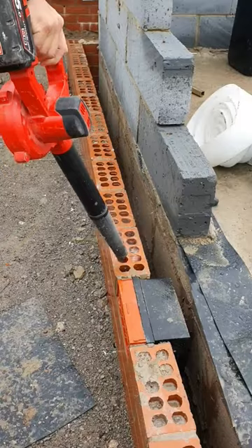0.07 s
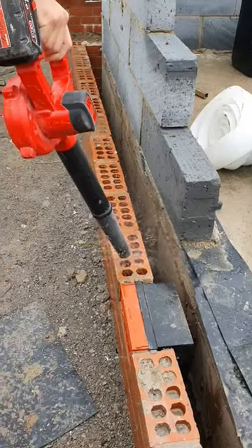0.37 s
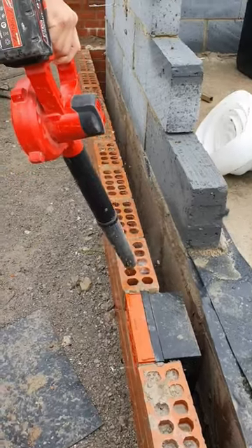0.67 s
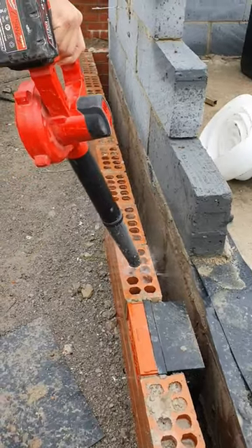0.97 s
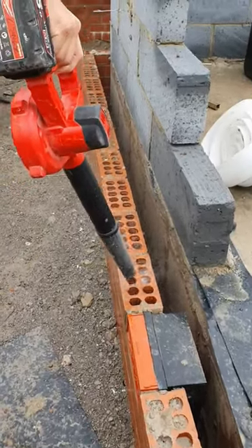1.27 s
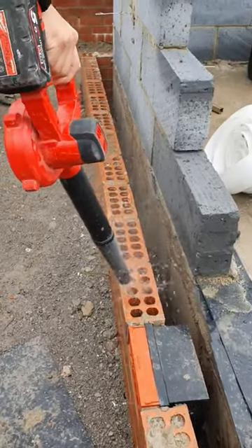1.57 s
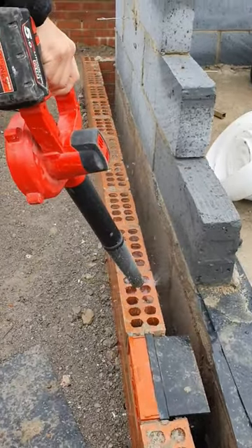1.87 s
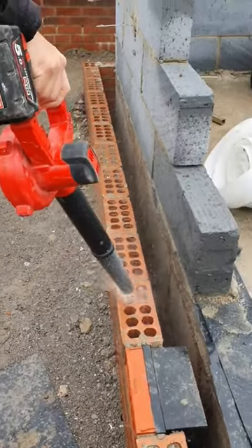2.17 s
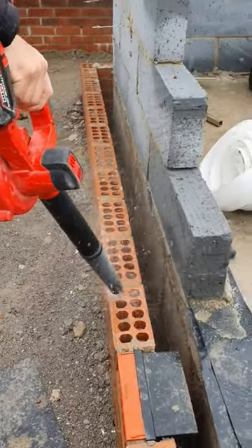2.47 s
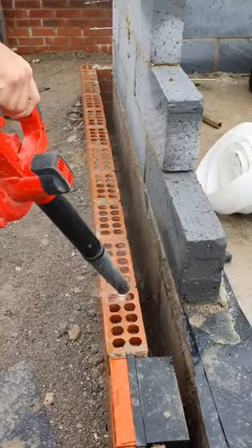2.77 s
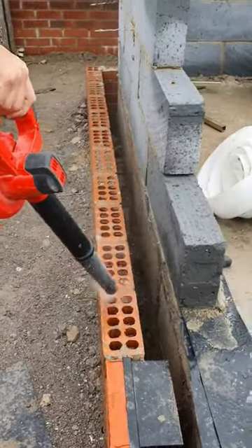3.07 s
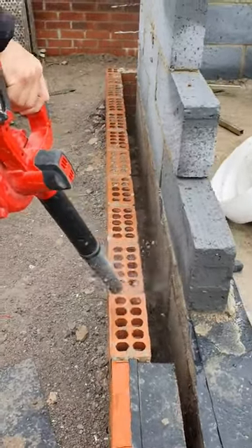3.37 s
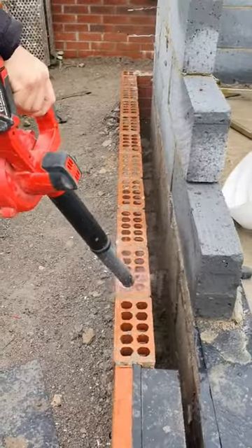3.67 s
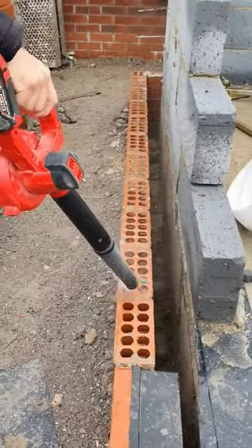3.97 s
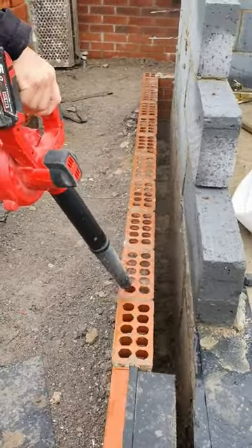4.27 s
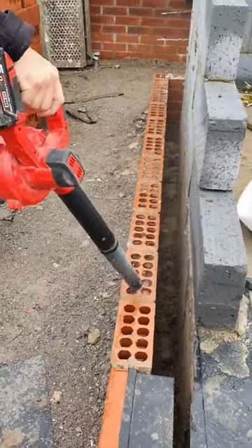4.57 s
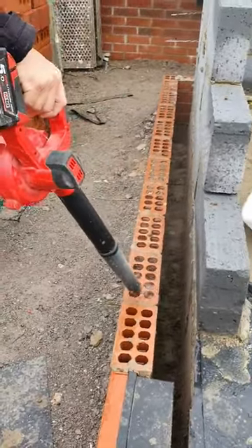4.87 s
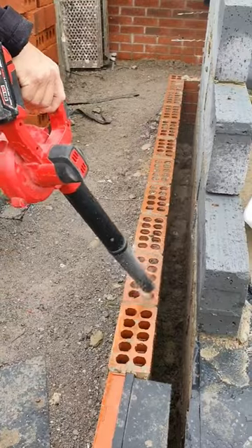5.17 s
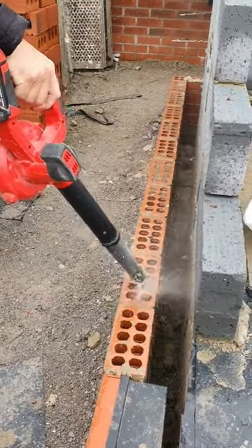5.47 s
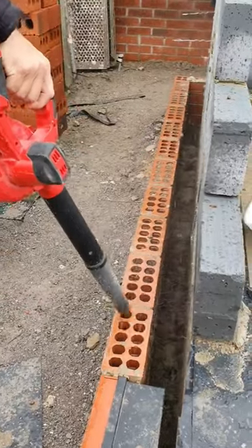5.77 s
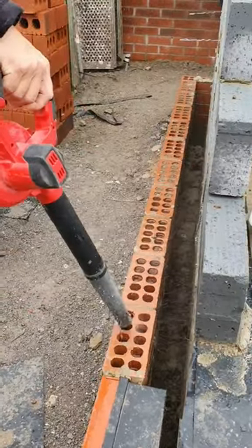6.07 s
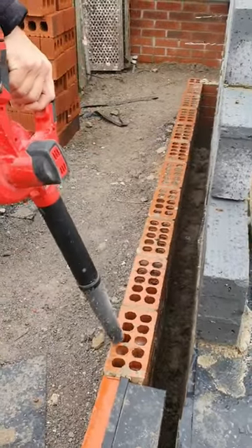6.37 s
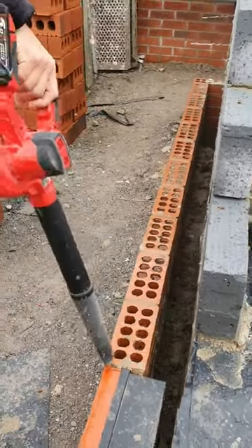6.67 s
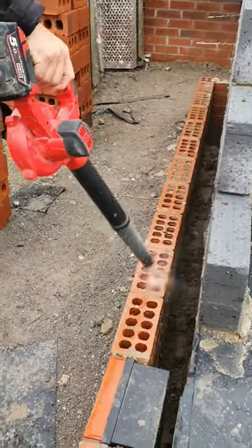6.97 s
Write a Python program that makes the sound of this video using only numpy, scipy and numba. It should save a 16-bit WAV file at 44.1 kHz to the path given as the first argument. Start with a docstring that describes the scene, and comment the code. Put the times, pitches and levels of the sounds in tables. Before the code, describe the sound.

On a building site, an arm's length from the microphone, a handheld blower clears water from holes in bricks. The fan's high whine and the rushing air never stop, while hollow howls and brief gliding whistles come and go over a spitting hiss. Low splutters of water come near the start and again after about five seconds. A far engine rumbles underneath, swelling slightly towards the end.

```python
"""On a building site, an arm's length away, a cordless blower at full speed clears water from the holes
of a brick course. Its impeller whines over the rush of air in the tube. The jet makes the holes howl and
whistle, rasps and sings on the brick edges, and throws up spitting spray and a few slugs of water.
An engine drones somewhere else on the site."""
import sys
import numpy as np
from scipy import signal
from scipy.fft import rfft, irfft
from scipy.io import wavfile
from scipy.ndimage import map_coordinates
from numba import njit

SR = 44100
rng = np.random.default_rng(int(sys.argv[2]) if len(sys.argv) > 2 else 0)


def log_audio(samples):
    """Write samples as a 16-bit WAV file to the path given in sys.argv[1]."""
    # one column per channel
    frames = np.atleast_2d(samples).T
    # limit to full scale, then quantise
    limited = np.clip(frames, -1, 1)
    pcm = np.round(limited * 32767).astype(np.int16)
    wavfile.write(sys.argv[1], SR, pcm)


N = 317961
TIME = np.arange(N) / SR
FREQ = np.maximum(np.fft.rfftfreq(N, 1 / SR), 1)


# Motor speed, sagging with battery and load. Each row: time in seconds, blade-pass pitch in Hz.
BLADE_PITCH = [(.13, 2955), (.9, 2959), (2.0, 2952), (3.0, 2953), (3.7, 2950), (4.9, 2947), (5.45, 2943),
               (6.0, 2951), (6.6, 2952), (7.0, 2946)]
# The whine at the two microphone ports. Each row: time in seconds, left level in dB, right level in dB.
WHINE_LEVELS = [(.16, -37, -40), (.5, -34.5, -33), (.84, -40, -34.5), (1.0, -37, -30.5), (1.6, -41, -25.5),
                (2.0, -28, -26), (2.1, -36, -30), (2.24, -33, -25), (2.46, -27.5, -25.5), (2.96, -36, -42),
                (3.2, -30, -25.5), (3.28, -31, -33), (3.34, -39, -39), (3.58, -27, -27.5),
                (3.78, -33.5, -35), (3.92, -34, -26), (4.08, -36, -46), (4.28, -34, -29), (4.6, -41, -29),
                (4.94, -49, -27), (5.06, -49, -30), (5.13, -33, -31), (5.22, -45, -30.5),
                (5.48, -32, -25.5), (5.76, -34, -24.5), (5.86, -29, -22.5), (5.96, -34, -34),
                (6.2, -32, -26), (6.32, -34, -32), (6.6, -33, -35), (6.72, -47, -36), (6.92, -42, -29.5),
                (7.0, -41, -23.5), (7.08, -44, -27.5), (7.18, -52, -41)]
# Grit on the whine. Each row: time in seconds, phase shake in radians.
WHINE_GRIT = [(1.0, 0.24), (2.2, 0.52), (3.9, 0.48), (4.2, .75), (4.8, 0.62), (5.2, 0.24), (5.9, 0.26)]
# Motor hum as the housing turns. Each row: time in seconds, shaft tone in dB, its octave in dB.
SHAFT_HUM = [(.13, -41, -40.5), (1.5, -41.5, -43.5), (3.2, -43.5, -40.5), (4.8, -43, -40.5),
             (6.0, -45, -41.5), (7.2, -52, -39)]

def impeller(blades=9, flutter_db=2.0, sway_db=1.3, wander_rad=.72, hum_sway_db=1.0):
    """The blades whine, the shaft hums; reflections shift the whine at each port as the tool moves."""
    blade_hz, = curves(BLADE_PITCH)
    shaft_db, octave_db = curves(SHAFT_HUM)
    shake_rad, = curves(WHINE_GRIT)
    shaft_phase = 2 * np.pi * np.cumsum(blade_hz / blades) / SR
    blade_phase = blades * shaft_phase + shake_rad * walk(60)  # uneven inflow roughens the tone
    flutter = flutter_db * walk(34)
    whine = []
    for port_db in curves(WHINE_LEVELS):
        gain = undb(port_db + flutter + sway_db * walk(15))
        whine.append(gain * np.sin(blade_phase + wander_rad * walk(7)))
    hum = undb(shaft_db) * np.sin(shaft_phase) + undb(octave_db) * np.sin(2 * shaft_phase)
    hum *= undb(hum_sway_db * walk(.99))
    return np.sqrt(2) * (np.array(whine) + hum)


# The howl between holes. Each row: time in seconds, centre in Hz, relative level in dB.
COURSE_HOWL = [(.14, 1720, -20.5), (.55, 1530, -23.5), (1.1, 1630, -21.5), (1.22, 1550, -30.5),
               (1.4, 1660, -25.5), (2.15, 1470, -25.5), (2.45, 1380, -27.5), (3.25, 1500, -25),
               (3.8, 1270, -29.5), (4.92, 1380, -28), (5.6, 1340, -26), (6.2, 1430, -21),
               (6.55, 1580, -21.5), (6.77, 1730, -28), (6.95, 1512, -20), (7.2, 1245, -33)]
# The jet crosses a hole. Each row: start and end in seconds, start and end pitch in Hz,
# relative howl level in dB, relative whistle level in dB.
HOLE_CROSSINGS = [(.133, .265, 1806, 1760, -29, -31), (0.149, .25, 1680, 1600, -28, -33),
                  (.268, 0.363, 1850, 1790, -24.5, -23), (0.338, 0.432, 1694, 1600, -23, -26),
                  (.44, 0.59, 880, 847, -27.5, -33), (0.487, 0.59, 1600, 1620, -24, -21.5),
                  (0.576, 0.694, 1720, 1640, -21.5, -33), (0.686, 0.825, 1632, 1660, -20, -22.5),
                  (0.702, 0.801, 2180, 1950, -34, -17.5), (0.808, 0.882, 1720, 1700, -20, -23),
                  (.83, .94, 858, 888, -31, -26), (.885, 0.943, 1800, 1760, -21, -17),
                  (.9, 1.004, 1520, 1543, -22.5, -17.5), (0.96, 1.061, 1640, 1620, -26.5, -29),
                  (1.246, 1.344, 1510, 1580, -22.5, -32), (1.345, 1.463, 1557, 1440, -24, -21),
                  (1.415, 1.49, 1930, 1915, -34, -23), (1.578, 1.715, 1450, 1410, -36, -27),
                  (1.78, 1.892, 1480, 1420, -29, -22), (1.76, 1.96, 1910, 1910, -40, -25.5),
                  (1.905, 2.016, 1500, 1402, -33, -23), (2.017, 2.102, 1936, 1930, -34, -22),
                  (2.101, 2.157, 1397, 1350, -35, -17), (2.185, 2.317, 1544, 1484, -23, -21),
                  (2.32, 2.479, 1357, 1397, -35, -27), (2.614, 2.745, 1410, 1300, -27, -19.5),
                  (2.553, 2.862, 1890, 1880, -40, -29), (2.784, 2.9, 1220, 1290, -47, -37),
                  (2.95, 3.043, 1476, 1530, -22, -31), (2.93, 3.1, 1840, 1900, -39, -34),
                  (3.05, 3.124, 1480, 1580, -27, -18.5), (3.17, 3.254, 1460, 1520, -33, -28),
                  (3.221, 3.355, 1930, 1885, -33, -24.5), (3.343, 3.448, 1188, 1290, -25, -25),
                  (3.46, 3.555, 1465, 1490, -35, -19), (3.59, 3.755, 1503, 1470, -29, -20),
                  (3.735, 3.84, 1467, 1370, -26.5, -22), (3.872, 3.96, 1390, 1408, -39, -30),
                  (4.002, 4.096, 1420, 1440, -47, -30), (4.104, 4.285, 1399, 1394, -30.5, -24.5),
                  (4.351, 4.46, 1450, 1420, -30, -30), (4.554, 4.863, 1430, 1420, -33, -22.5),
                  (4.551, 4.76, 1910, 1930, -37, -24.5), (4.955, 5.033, 1448, 1380, -31, -22.5),
                  (5.069, 5.19, 1760, 1660, -27, -31), (5.153, 5.273, 1870, 2060, -36, -23.5),
                  (5.187, 5.27, 1436, 1424, -29, -22), (5.356, 5.426, 1237, 1236, -42, -23),
                  (5.368, 5.45, 1425, 1410, -39, -20), (5.478, 5.587, 1420, 1400, -37, -24),
                  (5.629, 5.769, 1195, 1220, -44, -21.5), (5.655, 5.744, 1430, 1450, -28, -21),
                  (5.78, 5.89, 1816, 1860, -29, -26), (5.875, 6.062, 1413, 1540, -27.5, -20.5),
                  (6.057, 6.165, 1657, 1710, -29, -20), (6.22, 6.341, 1140, 1260, -26, -22.5),
                  (6.167, 6.365, 1880, 1977, -29, -21.5), (6.399, 6.485, 1360, 1430, -25, -20),
                  (6.464, 6.546, 1520, 1580, -30, -17.5), (6.566, 6.651, 1990, 2100, -27, -20),
                  (6.573, 6.662, 1620, 1580, -21, -17.5), (6.657, 6.795, 1654, 1620, -27, -19),
                  (6.775, 6.935, 1640, 1720, -34, -18), (6.874, 6.994, 1985, 1810, -26, -28),
                  (6.942, 7.018, 1580, 1400, -23, -30), (7.0, 7.078, 1186, 1166, -20, -23),
                  (7.058, 7.228, 1290, 1222, -36, -25)]

def hole_howls(tube, hole_trim_db=1, hole_width_hz=460, course_trim_db=-.5, course_width_hz=740):
    """The jet keeps the course howling; each part-filled hole it crosses howls up at its own pitch."""
    air = at_ports(turbulence(), tube)
    waver = np.exp(.034 * walk(38))
    centre_hz, course_db = curves(COURSE_HOWL)
    howl = howling(air, centre_hz * waver, course_width_hz) * undb(course_db + course_trim_db)
    air = at_ports(turbulence(), tube)
    for *path, db, _ in HOLE_CROSSINGS:
        inside, hz, envelope = crossing(*path)
        note = howling(air[:, inside], hz * waver[inside], hole_width_hz)
        howl[:, inside] += note * envelope * undb(db + hole_trim_db)
    throb_db = .5 * walk(35)
    return howl * undb(throb_db)


def hole_whistles(trim_db=-2.7, breadth_hz=75, purity=.84, saturation=.19, right_db=3.5, right_lead_rad=1):
    """Short, airy whistles that glide as the water level in a hole shifts."""
    tone = np.zeros(N, complex)
    for *path, _, db in HOLE_CROSSINGS:
        inside, hz, envelope = crossing(*path)
        tone[inside] += undb(db + trim_db) * envelope * np.exp(2j * np.pi * np.cumsum(hz) / SR)
    # turbulence shakes the tone's strength and phase; a hole can only sing so loud
    shake = purity + walk(breadth_hz) + 1j * walk(breadth_hz)
    shake /= np.sqrt(1 + saturation * abs(shake) ** 2)
    tone *= shake / np.sqrt(np.mean(abs(shake) ** 2) / 2)
    left = tone * undb(-right_db / 2)
    right = tone * undb(right_db / 2) * np.exp(1j * right_lead_rad)
    return np.real([left, right])


# Pan of the holes. Each row: time in seconds, added left-minus-right level in dB.
HOLE_PAN = [(.14, 1.5), (.9, 1.5), (1.5, -.3), (2.6, 0), (3.25, -1.6), (4.2, -0.5), (5.2, -1.3), (6.7, 1),
            (7.1, -1.5)]

def brick_holes(tube):
    """The howls and whistles of the holes drift together between left and right."""
    pan_db, = curves(HOLE_PAN)
    return (hole_howls(tube) + hole_whistles()) * undb(np.array([pan_db, -pan_db]) / 2)


# Air leaving the tube. Each row: time in seconds, relative level in dB.
RUSH_LEVEL = [(.14, -27), (.8, -27.5), (1.4, -28), (2.7, -26.5), (3.5, -26), (4.7, -27.5), (5.9, -26.5),
              (7.2, -28.5)]
# The broad body of the rush. Each row: frequency in Hz, gain in dB.
RUSH_EQ = [(30, -45), (110, -14), (170, -1.5), (280, -2), (450, -2), (720, -1), (900, 1), (1100, -4.5),
           (1600, -10.5), (2200, -9), (2900, -6), (3400, -10.5), (4200, -12), (6000, -72)]

def air_rush(tube, trim_db=-1.49, ground_delay_s=.002298, shortening_s_per_s=.000075):
    """Air rushes from the tube; its ground reflection arrives sooner as the tool comes lower."""
    level_db, = curves(RUSH_LEVEL)
    surge_db = sum(db * swell(s, spread_s) for s, _, spread_s, _, db in WATER_SLUGS)
    air = at_ports(turbulence(), tube * colour(RUSH_EQ))
    air = reflected(air, ground_delay_s - shortening_s_per_s * TIME, strength=.24)
    return normalised(air, band_hz=(200, 1000)) * undb(level_db + surge_db + trim_db)


# The running rasp. Each row: time in seconds, level in dB.
RASP_BED = [(.14, -32), (.9, -42), (1.3, -34), (2.8, -34.5), (3.35, -39), (3.85, -30.5), (5.6, -31.5),
            (6.1, -34), (7.2, -34.5)]
# The jet grazes a hole's rim. Each row: peak time in seconds, length in seconds, relative level in dB.
RIM_GRAZES = [(.21, .14, -43), (0.718, 0.087, -34), (3.075, 0.048, -33), (4.015, 0.037, -28),
              (4.116, 0.062, -27.5), (4.328, 0.2, -29), (4.487, 0.11, -29), (4.713, 0.18, -29.5),
              (5.125, 0.21, -26.5), (5.432, 0.096, -29.5), (5.85, 0.063, -28.5), (6.242, 0.12, -30.5),
              (6.62, 0.16, -35), (6.916, .08, -34)]
# The upper-mid bite of the rasp. Each row: frequency in Hz, gain in dB.
RASP_EQ = [(1200, -15), (1900, 1), (2200, 5), (2600, 1.5), (3100, 1.5), (3500, -6.5), (4200, -17.5),
           (7000, -79)]

def brick_rasp(graze_trim_db=-1):
    """Air rasps along the brick and flares where it grazes a rim."""
    bed_db, = curves(RASP_BED)
    grazes = sum(undb(db + graze_trim_db) * swell(s, length / 2) for s, length, db in RIM_GRAZES)
    rasp = normalised(at_ports(turbulence(), colour(RASP_EQ)), band_hz=(2150, 2850))
    return rasp * np.hypot(undb(bed_db), grazes)


# Spray off the brick. Each row: time in seconds, relative hiss level in dB, relative fizz level in dB.
SPRAY_LEVELS = [(.14, -37, -38), (.75, -38, -37), (1.25, -36, -38.5), (1.48, -37, -37), (1.62, -36, -38.5),
                (2.3, -35.5, -36.5), (2.88, -35.5, -39), (3.08, -36, -37.5), (3.6, -36, -36.5),
                (3.8, -34.8, -36), (4.1, -35.5, -34.5), (4.7, -36.5, -34.5), (5.15, -36.5, -36.5),
                (5.32, -38.5, -34.5), (5.5, -36, -36), (5.9, -35.5, -35.5), (6.4, -36.5, -38.5),
                (7.2, -36, -35.5)]
# The sheen of the spray. Each row: frequency in Hz, gain in dB.
SPRAY_EQ = [(1500, -25), (3000, 0), (4200, 4.5), (6100, 0.5), (7000, -3), (8500, -2.5), (9400, 0),
            (10500, -5), (13000, -7.5), (14200, -18), (15300, -22)]

def spray(tube, drops_per_s=2600, wetness=.48, spit_db=1.9, fizz_above_hz=7400):
    """Fine droplets spit through the air noise: a hiss with a fizz on top."""
    hiss_db, fizz_db = curves(SPRAY_LEVELS)
    drops = (rng.random((2, N)) < drops_per_s / SR) * turbulence()
    wet_air = turbulence() + wetness * drops / drops.std() * undb(spit_db * walk(5.5))
    mist = normalised(at_ports(wet_air, tube * colour(SPRAY_EQ)), band_hz=(4000, 13000))
    fizz = filtered(mist, FREQ > fizz_above_hz)
    return (mist - fizz) * undb(hiss_db) + fizz * undb(fizz_db)


def jet(tube, echo_s=.0036, flicker_db=1.0):
    """Eddies in the jet make its rush, rasp and spray flicker together."""
    mist, rush, rasp = spray(tube), air_rush(tube), brick_rasp()
    # the blockwork throws back an echo whose path changes as the nozzle moves
    delay_s = echo_s * np.exp(.0708 * walk(1))
    air = rush + reflected(rasp + mist, delay_s, strength=.4)
    return air * undb(flicker_db * walk(18))


# An edge sings. Each row: start and end in seconds, start and end pitch in Hz,
# resonator width in Hz, relative level in dB.
EDGE_NOTES = [(0.202, 1.1, 2970, 2960, 220, -35), (.15, 1.0, 4870, 4800, 200, -43.5),
              (.15, 1.0, 4080, 4100, 200, -45), (1.02, 2.15, 2530, 2520, 200, -37),
              (1.55, 2.85, 3450, 3460, 90, -44), (1.9, 2.6, 4980, 5000, 300, -42),
              (2.15, 2.923, 2540, 2510, 200, -31.5), (2.762, 2.98, 6150, 6300, 280, -41),
              (3.03, 3.168, 2570, 2500, 160, -27.5), (3.24, 3.43, 6280, 6050, 400, -39),
              (3.878, 4.08, 2540, 2580, 300, -29), (3.86, 4.2, 3070, 3100, 260, -36),
              (3.88, 4.2, 7050, 7000, 500, -42), (4.19, 4.33, 3130, 3060, 220, -28.5),
              (4.325, 4.864, 3080, 3180, 300, -33.5), (5.08, 5.22, 3000, 3070, 300, -34),
              (5.18, 5.46, 7100, 6950, 600, -41.5), (5.89, 6.01, 5050, 5100, 450, -31),
              (5.923, 6.0, 4150, 4130, 330, -41), (5.95, 6.027, 3540, 3560, 150, -31),
              (6.15, 6.5, 4140, 4250, 330, -37), (6.41, 6.51, 5950, 5800, 500, -41),
              (6.67, 6.8, 5700, 5780, 450, -35)]

def singing_edges(trim_db=-1, centre_cut=.49, widen_above_hz=4500):
    """Air squeezed past a sharp edge sings in a bright, rough band of noise."""
    air = at_ports(turbulence(), 1)
    notes = np.zeros((2, N))
    for *path, width_hz, db in EDGE_NOTES:
        inside, hz, envelope = crossing(*path)
        band = howling(air[:, inside], hz, width_hz)
        notes[:, inside] += band / band.std() * envelope * undb(db + trim_db)
    # thinning the centre pushes the top towards opposite phase at the ports
    return notes - centre_cut * filtered(notes.mean(axis=0), FREQ > widen_above_hz)


# Water blown out of a hole. Each row: peak time in seconds, pitch in Hz, spread in seconds,
# level in dB, push on the air rush in dB.
WATER_SLUGS = [(0.555, 288, 0.11, -29.5, 1), (0.917, 235, 0.032, -26, 0.5), (1.193, 90, 0.032, -27.5, -1),
               (5.199, 273, 0.0083, -22.5, 2), (5.273, 473, 0.0078, -35, 4.5)]

def water_slugs(relative_width=.7):
    """A slug of water leaves a hole with a short, low splutter."""
    splutter = np.zeros(N)
    for s, hz, spread_s, db, _ in WATER_SLUGS:
        envelope = swell(s, spread_s)
        burst = resonate(rng.standard_normal(N), np.full(N, float(hz)), relative_width * hz) * envelope
        splutter += undb(db) * burst * envelope.std() / burst.std()
    return splutter


# The engine's note. Each row: time in seconds, pitch in Hz, relative level in dB.
ENGINE_DRONE = [(.14, 135.7, -37), (2.4, 131.2, -40.5), (3.3, 123, -36), (4.5, 126.7, -44.5),
                (5.1, 123.5, -34), (5.6, 121.2, -34.5), (5.8, 119.7, -23.5), (5.97, 120.5, -31),
                (6.25, 120.1, -27.5), (6.5, 119.3, -32.5), (6.8, 119.4, -39), (7.2, 116, -36)]
# The engine's low end. Each row: time in seconds, relative level in dB.
RUMBLE_LEVEL = [(.14, -35), (.5, -34), (.95, -37), (1.3, -33.5), (2.4, -40.5), (3.7, -37), (4.45, -33),
                (5.7, -33), (6.05, -35.5), (6.7, -34.5), (6.95, -38.5), (7.2, -32.5)]
# The weight of the rumble. Each row: frequency in Hz, gain in dB.
RUMBLE_EQ = [(20, -55), (30, -40), (40, -11), (50, -3.5), (70, -2.5), (100, -1.5), (140, -4), (190, -19.5),
             (400, -34.5)]

def distant_engine(rumble_trim_db=-1, drone_trim_db=-2, sub_trim_db=-6, waver_db=2.4):
    """A far engine's slowly sagging drone, over a rumble and a tone an octave below the drone."""
    hz, drone_db = curves(ENGINE_DRONE)
    low_db, = curves(RUMBLE_LEVEL)
    phase = 2 * np.pi * np.cumsum(hz) / SR
    drone = np.sqrt(2) * np.sin(phase) * undb(drone_db + drone_trim_db + waver_db * walk(3.6))
    sub = np.sqrt(2) * np.sin(phase / 2) * undb(sub_trim_db + waver_db * walk(3.2))
    rumble = normalised(at_ports(turbulence(), colour(RUMBLE_EQ)), band_hz=(40, 105))
    return drone + (sub + rumble * undb(rumble_trim_db)) * undb(low_db)


# The hollow voice of the blower. Each row: centre in Hz, width in Hz, boost or cut in dB.
TUBE_RESONANCES = [(211, 60, 5), (399, 55, 6), (575, 95, 5), (800, 154, 3.5), (1192, 140, 5), (1397, 36, 5),
                   (1890, 150, 7), (1950, 83, -5), (2530, 53, 7), (3500, 88, 5), (3930, 110, -4.5),
                   (3960, 180, 2), (4620, 220, -3), (4970, 240, 3), (5930, 200, 2.5), (9300, 190, 2)]

def tube_colour():
    """Gain per bin from the resonances of tube and fan housing."""
    return undb(sum(bell_db(hz, width_hz, db) for hz, width_hz, db in TUBE_RESONANCES))


# Where the nozzle points. Each row: time in seconds, left-port lag in seconds, top-treble lift in dB.
NOZZLE_AIM = [(.13, -4e-5, 0), (1.7, 0, 0.5), (2.3, 1e-5, 5), (2.75, 3e-5, 5.5), (4.2, -2e-5, -2),
              (4.8, -2e-5, -0.5), (5.7, -2e-5, -2.5), (6.3, 2e-5, 6), (6.7, 4e-5, -3), (7.2, -1e-5, -5)]

def aimed(pair, beam_hz=10500):
    """Swinging the nozzle shifts the sound between the ports and turns its narrow treble beam."""
    lag_s, top_db = curves(NOZZLE_AIM)
    top = filtered(pair, 1 / (1 + (beam_hz / FREQ) ** 8))
    left, right = pair + top * (undb(top_db) - 1)
    left = map_coordinates(left, [np.arange(N) - lag_s * SR], order=5, mode="nearest")
    return np.array([left, right])


# Stereo width at the ports. Each row: frequency in Hz, coherence from 0 to 1, left lead in radians.
PORT_COHERENCE = [(60, .99, 0), (160, .97, 0), (400, .9, 0), (1100, .8, -.1), (1400, .75, -1.0),
                  (2000, .7, -1.0), (2600, .7, -.4), (3100, .4, 0), (3500, .1, -1.2), (4200, .4, -2.6),
                  (6400, .4, -2.3), (7500, .55, -3.0), (9300, .1, -2.5), (12500, .4, 0), (15000, .1, 0)]
# Stereo tilt. Each row: frequency in Hz, left-minus-right level in dB.
PORT_BALANCE = [(60, -1.5), (380, -2.5), (850, -0.5), (1120, -2), (1330, 0), (2000, -3.5), (3100, -3.5),
                (4000, 0.5), (7400, 0), (8300, 12.5), (9100, 5), (9700, 0), (15000, 1.5)]

def at_ports(pair, gain):
    """Colour two unrelated signals and blend them into what the two microphone ports pick up."""
    coherence, lead_rad = over_hz(PORT_COHERENCE)
    tilt_db, = over_hz(PORT_BALANCE)
    first, second = rfft(pair) * gain
    mid, side = first * np.sqrt(1 + coherence), second * np.sqrt(1 - coherence)
    lean = undb(tilt_db / 2) * np.exp(.5j * lead_rad)
    return irfft(np.array([(mid + side) * lean, (mid - side) / lean]), N)


def crossing(start, end, start_hz, end_hz, attack_s=.029, release_s=.042):
    """One pass over a hole or edge: its samples, its gliding pitch and its envelope."""
    inside = (TIME > start) & (TIME < end)
    t = TIME[inside]
    ramp = np.minimum((t - start) / attack_s, (end - t) / release_s)
    envelope = np.sin(np.pi / 2 * np.minimum(ramp, 1))
    return inside, np.interp(t, [start, end], [start_hz, end_hz]), envelope


def howling(pair, hz, width_hz):
    """Air through a steep resonance (two band-passes), with its centre at rms 1."""
    band = np.array([resonate(resonate(x, hz, float(width_hz)), hz, float(width_hz)) for x in pair])
    return band / band.mean(axis=0).std()


@njit
def resonate(x, hz, width_hz):
    """State-variable band-pass with a moving centre."""
    y, band_state, low_state = np.empty(len(x)), 0., 0.
    for i in range(len(x)):
        tuning, damping = np.tan(np.pi * hz[i] / SR), width_hz / hz[i]
        band = (band_state + tuning * (x[i] - low_state)) / (1 + tuning * (tuning + damping))
        band_state = 2 * band - band_state
        low_state += 2 * tuning * band
        y[i] = damping * band
    return y


def reflected(pair, delay_s, strength):
    """Add one reflection of changing delay: a shifting, hollow colour at the same loudness."""
    echo = np.array([np.interp(TIME - delay_s, TIME, x) for x in pair])
    return (pair + strength * echo) / np.hypot(1, strength)


def turbulence():
    """Two unrelated white noises."""
    return rng.standard_normal((2, N))


def walk(rate_hz):
    """A smooth random wobble of spread 1, moving at up to about rate_hz."""
    wobble = filtered(rng.standard_normal(N), 1 / (1 + (FREQ / rate_hz) ** 4))
    return wobble / wobble.std()


def swell(peak_s, spread_s):
    """A bell-shaped rise and fall around a moment."""
    return np.exp(-.5 * ((TIME - peak_s) / spread_s) ** 2)


def normalised(pair, band_hz):
    """Scale a stereo pair so that its centre has rms 1 within a band."""
    inside = (FREQ > band_hz[0]) & (FREQ < band_hz[1])
    return pair / filtered(pair.mean(axis=0), inside).std()


def filtered(x, gain):
    """Apply a gain per frequency bin."""
    return irfft(rfft(x) * gain, N)


def bell_db(hz, width_hz, db):
    """One EQ peak or dip, in dB per bin."""
    return db / (1 + (2 * (FREQ - hz) / width_hz) ** 2)


def colour(eq):
    """Gain per bin of an EQ table."""
    return undb(over_hz(eq)[0])


def over_hz(table):
    """The columns of a frequency table, one value per bin."""
    hz, *columns = np.transpose(table)
    return [np.interp(np.log(FREQ), np.log(hz), c) for c in columns]


def curves(table):
    """The columns of a time table, one value per sample."""
    s, *columns = np.transpose(table)
    return [np.interp(TIME, s, c) for c in columns]


def undb(db):
    """Decibels to gain."""
    return 10 ** (np.asarray(db) / 20)


def scene():
    """The blower at work, with the site behind it."""
    tube = tube_colour()
    holes = brick_holes(tube)
    return impeller() + aimed(holes + singing_edges() + jet(tube)) + water_slugs() + distant_engine()


def record(dry, start_s=.129, rise_s=.012, top_hz=15250):
    """The microphone has a narrow treble notch; the sound opens quickly and the top is cut."""
    notch = undb(bell_db(hz=7420, width_hz=600, db=-9))
    opening = (TIME > start_s) * (1 - .69 * np.exp(-np.maximum(TIME - start_s, 0) / rise_s))
    low_pass = signal.ellip(10, .2, 80, top_hz, fs=SR, output="sos")
    return signal.sosfilt(low_pass, filtered(dry, notch) * opening)


dry = scene()
out = record(dry)
log_audio(out)
```